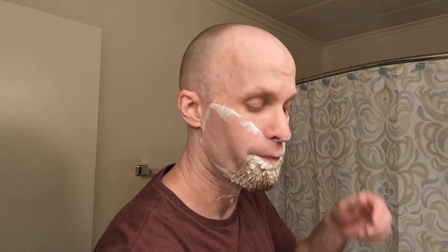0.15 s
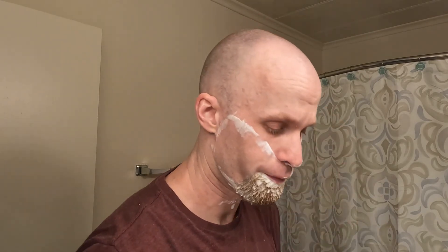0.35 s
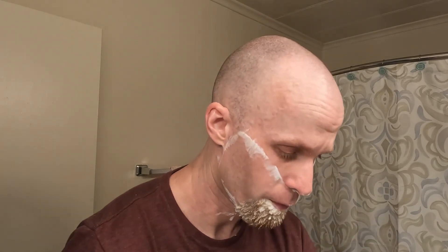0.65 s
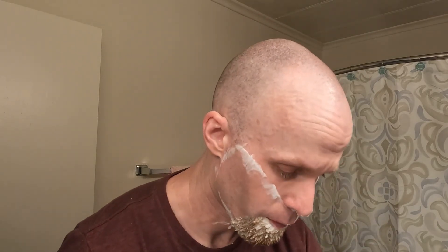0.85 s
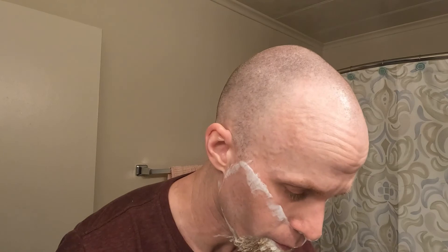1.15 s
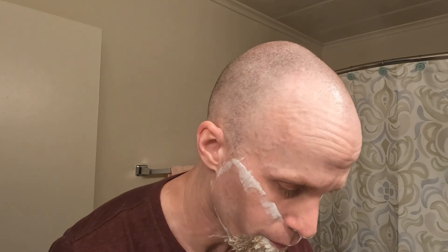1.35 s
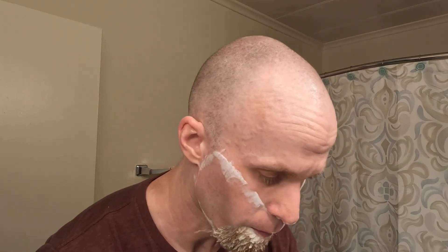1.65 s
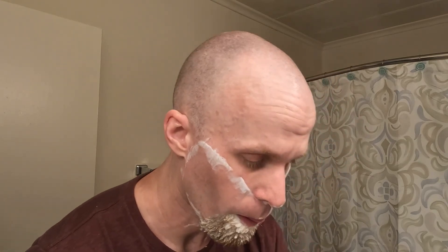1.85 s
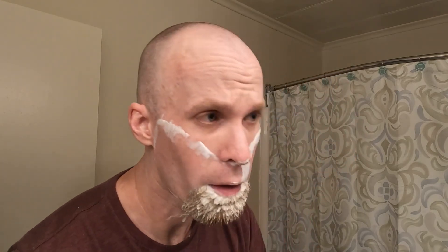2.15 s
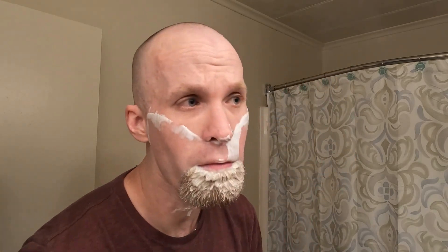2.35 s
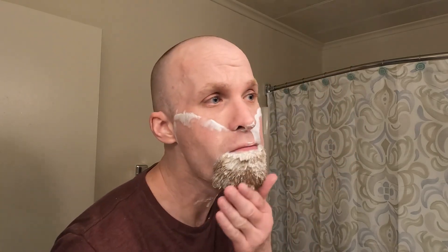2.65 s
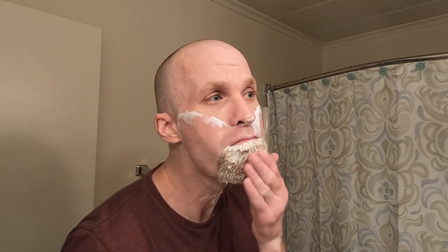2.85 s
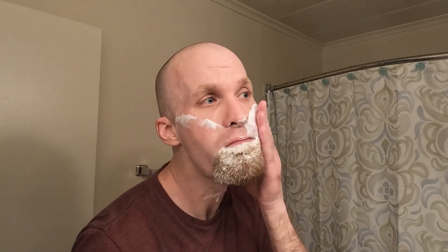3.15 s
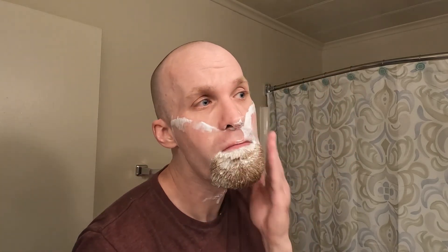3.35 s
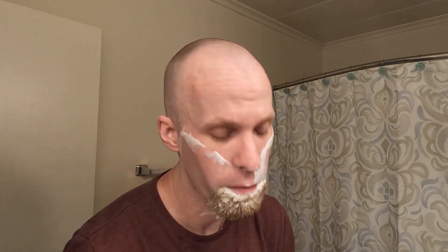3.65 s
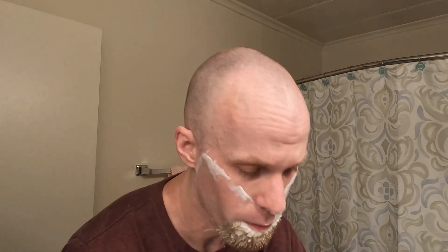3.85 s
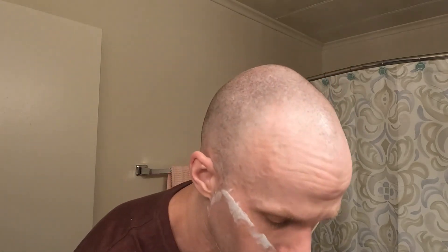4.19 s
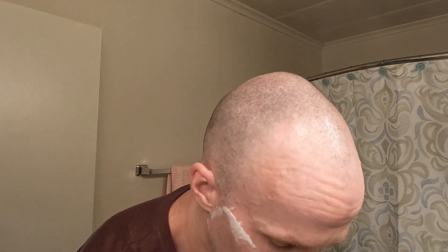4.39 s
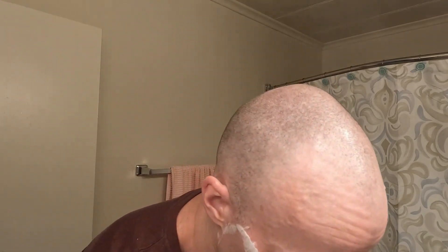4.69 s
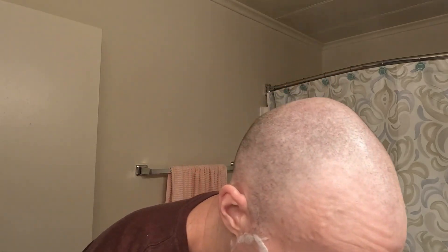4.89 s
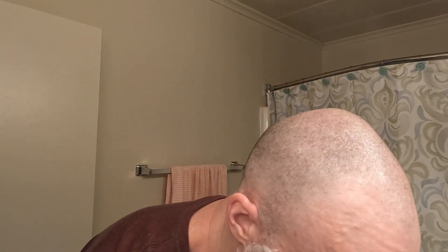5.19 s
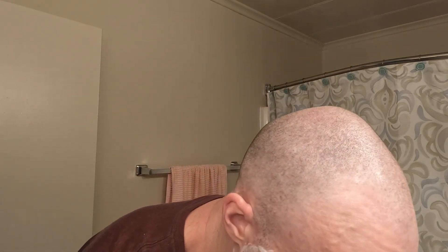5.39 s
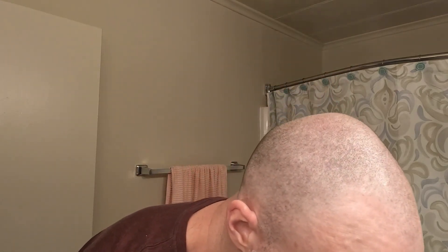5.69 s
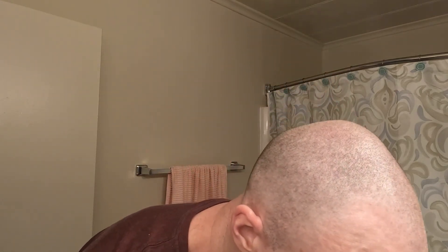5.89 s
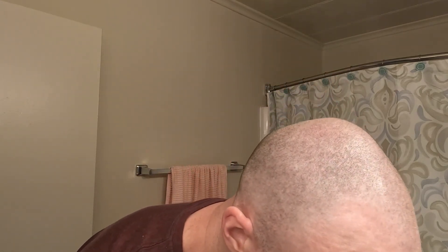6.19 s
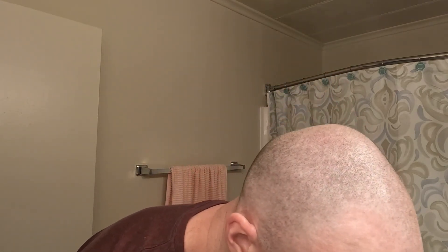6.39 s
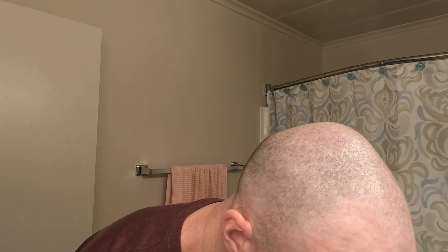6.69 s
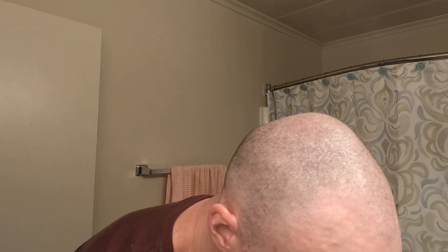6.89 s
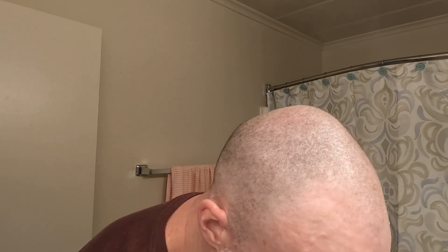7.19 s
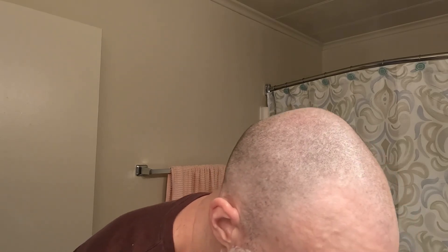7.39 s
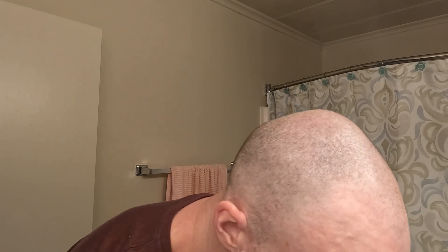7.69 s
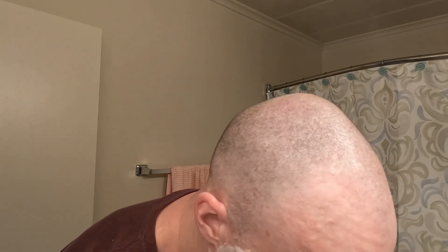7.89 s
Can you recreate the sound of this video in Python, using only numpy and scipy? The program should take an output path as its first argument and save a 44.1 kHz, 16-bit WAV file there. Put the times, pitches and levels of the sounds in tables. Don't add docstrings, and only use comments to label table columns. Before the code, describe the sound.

Tap water bursts into a basin, stops with a sharp knock, a palm rasps over a beard, then water runs longer and knocks off.

```python
import sys
import numpy as np
from scipy import signal
from scipy.fft import rfft, irfft, next_fast_len
from scipy.io import wavfile
from scipy.ndimage import uniform_filter1d

SR = 44100
rng = np.random.default_rng(int(sys.argv[2]) if len(sys.argv) > 2 else 0)


def natural_amplitude(level_db):
    exponent = np.asarray(level_db, float) / 20
    return 10 ** exponent


def materialize(psi):
    bounded = np.clip(np.atleast_2d(psi).T, -1, 1)
    quanta = np.round(bounded * 32767).astype(np.int16)
    wavfile.write(sys.argv[1], SR, quanta)


N = 354563

# water arrives in s, valve shuts in s, spray level in dB, drone level in dB.
TAP = [
    (0.631, 1.666, -34.5, -42),
    (4.059, 7.986, -34.5, -42.5),
]
# frequency in Hz, gain in dB.
MICROPHONE = [(25, -5), (60, -8.5), (110, 0), (8600, -0.5), (10000, -0.5), (11000, 4), (11900, -12.5),
              (12800, -8.5), (13400, -17.5), (13900, -20), (14100, -29), (15600, -25)]


def jet():
    spray_sound, mist_sound, drone_sound = spray(), mist(), drone()
    surge_db = hand_surges()
    thin = filtered(spray_sound, lambda f: 1 / (1 + (4000 / (f + 1)) ** 6))
    out = np.zeros(N)
    for opens, shuts, spray_db, drone_db in TAP:
        spray_gate = valve(opens, shuts, rise_s=0.015, fall_db_s=195)
        out += natural_amplitude(spray_db - 1 + surge_db) * spray_gate * spray_sound

        mist_gate = valve(opens, shuts + 0.099, rise_s=0.015, fall_db_s=232)
        out += natural_amplitude(spray_db - 16.5 + 2.6 * surge_db) * mist_gate * mist_sound

        thin_fade_in = np.minimum(since(shuts)[0] / 0.035, 1)
        break_off_db = 700 * since(shuts + 0.099)[0]
        out += natural_amplitude(spray_db - break_off_db) * thin_fade_in * thin

        drone_gate = valve(opens - 0.0088, shuts, rise_s=0.013, fall_db_s=137)
        out += natural_amplitude(drone_db) * drone_gate * drone_sound
    return out


def spray():
    # frequency in Hz, gain in dB.
    tone = [(300, -48.5), (800, -42.5), (1200, -11.5), (1700, -8.5), (2100, -5), (3000, -2.5), (3700, -1),
            (5000, -2), (6900, -6), (8500, -13), (9200, -18.5)]
    # frequency in Hz, width in Hz, lift in dB.
    bowl = [(1500, 60, 3), (1970, 110, 5), (2140, 45, 3.5), (2350, 60, 4), (2775, 100, 4.5), (3018, 80, 4),
            (3537, 80, 6), (3760, 60, 3), (6815, 90, 2.5)]

    def lift_db(f):
        return sum(db / (1 + ((f - center) / wide * 2) ** 2) for center, wide, db in bowl)

    def sway_gain(f):
        lift = uniform_filter1d(lift_db(f), size=1500)
        return natural_amplitude(along(tone, f)) * (natural_amplitude(lift) - 1)

    water = patchy(1.62, wide=3, long=16) + 0.41 * crackle(900, spread_db=3.0)
    water += 0.19 * bubbles(360, mid_hz=3610, cycles=16.7)
    steady = unit(filtered(water, lambda f: natural_amplitude(along(tone, f) + lift_db(f))))
    sway = unit(filtered(patchy(5.2, wide=2, long=110), sway_gain))
    return unit(steady + 0.21 * sway)


def bubbles(per_s, mid_hz, cycles):
    draw = rng.random((3000, 3))[:int(per_s * N / SR)]
    hz = mid_hz * np.exp(2.27 * (draw[:, 1:2] - .5))
    t = np.arange(400) / SR
    u = t * hz / cycles
    size = natural_amplitude(-3 * np.log(draw[:, 2:] + 0.0064))
    swell = (1 - np.exp(-6 * u)) * np.exp(-2 * u)
    pips = size * np.sin(2 * np.pi * hz * t * (1 + 0.05 * u)) * swell
    where = (draw[:, :1] * N).astype(int) + np.arange(400)
    return unit(np.bincount(where.ravel(), pips.ravel(), minlength=N)[:N])


def mist():
    # frequency in Hz, gain in dB.
    tone = [(7000, -54), (8500, -5), (16000, 3)]
    fine = patchy(1.7, wide=8, long=8) + 0.49 * crackle(650, spread_db=1.5)
    fizz = filtered(fine, lambda f: natural_amplitude(along(tone, f)))
    return fizz / np.std(filtered(fizz, lambda f: natural_amplitude(along(MICROPHONE, f))))


def drone():
    # frequency in Hz, width in Hz, level in dB.
    resonances = [(141, 24, -21), (246, 55, -7.5), (330, 27, -24.5), (404.3, 34, 2), (444.6, 32.4, 2.5),
                  (490, 14.5, -0.5), (553.4, 18.4, 2), (676, 15, -2.5), (878, 12, -12), (1082, 21.6, -5),
                  (1500, 25, -27.5), (1924, 270, -8), (3260, 51, -29)]

    def gain(f):
        power = 0
        for hz, wide, db in resonances:
            power = power + abs(natural_amplitude(db) * f * wide / (hz * hz - f * f + 1j * f * wide)) ** 2
        return np.sqrt(power)

    return unit(filtered(patchy(3.13, wide=1, long=20), gain))


def hand_surges():
    # start in s, lift in dB, fade time in s.
    surges = [
        (.77, 3, .2),
        (1.2, 3.5, .25),
        (1.5, 1.5, .3),
        (4.2, 3.5, .1),
        (4.72, 2.5, .3),
        (5.95, 1.2, .15),
        (6.27, 1, .15),
        (6.83, 3, .15),
        (7.22, 1, .15),
        (7.7, 2, .3),
    ]
    lift_db = np.zeros(N)
    for s, db, fade in surges:
        after = since(s)[0]
        lift_db += db * (1 - np.exp(-after / 0.013)) * np.exp(-after / fade)
    return lift_db


def valve(opens, shuts, rise_s, fall_db_s):
    after, before = since(opens)
    climb_db = -50 * np.exp(-after / rise_s)
    return (before == 0) * natural_amplitude(climb_db - fall_db_s * since(shuts)[0])


def splashes():
    # time in s, level in dB, middle frequency in Hz, length in s.
    broad = [(.786, -30.5, 5010, 0.021), (1.106, -29.5, 1860, .013), (1.107, -37.5, 850, .011),
             (1.216, -27.5, 4000, 0.013), (1.299, -29.5, 3500, 0.012), (1.453, -30, 4400, .0076),
             (1.506, -26.5, 4380, 0.0068), (1.819, -42, 6568, .003), (1.889, -48, 4500, .004),
             (1.915, -59, 4560, 0.013), (2.046, -64, 9000, .012), (4.236, -31, 5100, 0.013),
             (6.835, -25.5, 3200, 0.009), (7.271, -34, 4940, .012), (7.321, -31.5, 4480, .013)]
    # time in s, level in dB, middle frequency in Hz, length in s.
    squirts = [
        (1.246, -29, 5600, 0.0083),
        (4.045, -56, 2300, .016),
        (4.901, -30.5, 3900, 0.018),
        (5.051, -34, 2260, .033),
        (6.266, -32, 1980, .012),
        (7.366, -33, 2370, 0.018),
        (7.975, -35.5, 4280, .018),
    ]
    # time in s, level in dB, middle frequency in Hz, length in s.
    gurgles = [
        (.131, -74, 6200, .018),
        (1.336, -33, 2700, .015),
        (6.311, -34, 1500, 0.013),
        (6.851, -35, 2460, 0.014),
        (7.76, -44, 3400, .028),
    ]
    # time in s, peak level in dB, pitch in Hz, length in cycles.
    drops = [(1.7011, -23.5, 5070, 12), (2.7266, -45, 3030, 4), (2.8612, -36, 3000, 2.9),
             (3.0913, -41, 1660, 3.8), (4.6151, -25.5, 2580, 14), (4.7081, -15, 3470, 8.5),
             (4.7118, -18.5, 3490, 4.4), (4.7163, -25.5, 3340, 6.2), (7.2154, -32.5, 2010, 13),
             (7.4404, -29, 2810, 14), (7.8211, -32.5, 1088, 13)]
    # time in s, peak level in dB, middle frequency in Hz.
    drips = [(0.619, -58, 3970), (1.8851, -47, 4800), (1.9721, -58, 11500), (2.0091, -47, 10000),
             (2.034, -45, 8000), (2.038, -43, 12500), (2.0387, -48, 3300), (2.1099, -63, 11140),
             (2.1831, -63, 10000), (2.2431, -64, 9560), (3.1601, -56, 11500), (4.032, -45, 1970),
             (4.072, -46, 2980)]

    out = puffs(broad, octaves=.56) + puffs(squirts, octaves=0.19) + puffs(gurgles, octaves=0.074)
    t = np.arange(4096) / SR
    for s, db, hz, cycles in drops:
        u = t * hz / cycles
        swell = (1 - np.exp(-8 * u)) * np.exp(-1.7 * u)
        rising_tone = np.sin(2 * np.pi * hz * t * (1 + .02 * u))
        add(out, s, natural_amplitude(db + 3) * rising_tone * swell)
    for s, db, hz in drips:
        add(out, s, natural_amplitude(db - 6.5 - 60 * t / 0.024) * band(hz, 0.82, size=4096))
    return out


def lever():
    # time in s, level in dB, tilt in dB per octave, rattle level in dB.
    knocks = [(0.6164, -22.5, -2.5, -10), (0.6236, -21, 0.5, -16), (1.6751, -17.5, 4, 1.5),
              (1.6841, -12.5, 1, -2.5), (1.6968, -23.5, -5.5, 4.5), (4.0308, -34, -3.5, -2),
              (4.0435, -36.5, -3.5, -7), (7.9909, -21.5, -4, -14), (8.0012, -17, 2.5, -12),
              (8.0085, -20.5, -4, 2), (8.0264, -24, 0, -8)]
    # frequency in Hz, level in dB, time to fall 60 dB in s.
    modes = [(75.1, -16, 0.72), (120, -8, 0.15), (150, -6.5, 0.31), (192, -5.5, 0.094), (245, 2, 0.19),
             (330, -11, 0.32), (419, -1, 0.15), (442, 3.5, 0.03), (511, -1.5, 0.043), (528, 3.5, 0.044),
             (599, -6, 0.28), (674.4, -9.5, 0.17)]
    # time in s, level in dB, middle frequency in Hz, length in s.
    bumps = [(.265, -47, 325, 0.0157), (2.146, -51, 367, .013), (2.318, -54, 333.5, 0.012),
             (2.47, -65, 298, 0.011), (2.577, -59, 305, .014), (2.855, -58, 150, .0174),
             (2.953, -50, 278, 0.0123), (3.134, -62, 370, 0.0076), (3.212, -52.5, 330, 0.0093),
             (3.287, -55, 390, .0077), (3.59, -58, 350, 0.0115)]
    # time in s, level in dB, middle frequency in Hz, length in s.
    raps = [
        (.51, -55.5, 560, .029),
        (2.72, -56, 563, .027),
        (3.549, -48.5, 368, .008),
        (3.551, -63, 800, .008),
        (3.77, -52, 466, 0.028),
        (3.78, -63, 1000, .018),
    ]

    out = puffs(bumps, octaves=0.2) + puffs(raps, octaves=0.35)
    t = np.arange(SR // 2) / SR
    for s, db, tilt_db, rattle_db in knocks:
        ring = np.zeros(len(t))
        for hz, level, t60 in modes:
            strength_db = level + tilt_db * np.log2(hz / 400) + rng.normal(0, 0.6)
            wobble = 0.033 * np.cumsum(rng.standard_normal(len(t)))
            tone = np.sin(2 * np.pi * hz * rng.normal(1, .03) * t + wobble)
            ring += natural_amplitude(strength_db - 60 * t / t60) * tone * rng.choice([1, 1, -1])
        thud = natural_amplitude(3.5 - 60 * t / 0.11) * band(382, 0.38, size=len(t))
        rattle = natural_amplitude(rattle_db - 8.5 - 60 * t / 0.14) * band(1055, 0.41, size=len(t))
        onset = 1 - np.exp(-t / 0.0013)
        add(out, s, natural_amplitude(db - 10.0) * (ring + thud + rattle) * onset)
    return out


def creak():
    out, t = np.zeros(N), np.arange(SR // 10) / SR
    swell = np.sin(np.pi * t * 10) ** .5
    flutter = 1 + .5 * np.sin(2 * np.pi * 33 * t)
    add(out, 3.903, natural_amplitude(-50.0) * swell * np.sin(2 * np.pi * 410 * t) * flutter)
    return out


def palm():
    # frequency in Hz, gain in dB.
    beard = [(900, -34), (2000, -9.5), (3200, -2), (5500, -7), (8000, -16.5), (16000, -18)]
    # start in s, length in s, level in dB, skin level over bristles in dB.
    strokes = [
        (2.525, 0.062, -55, -20),
        (2.715, 0.19, -55.5, -9.5),
        (2.867, .19, -51, -9),
        (3.096, 0.049, -63.5, 3),
    ]

    snaps = patchy(2.2, wide=4, long=10) + .6 * crackle(1500, spread_db=2.5)
    bristle = unit(filtered(snaps, lambda f: natural_amplitude(along(beard, f))))
    rub = patchy(2.5, wide=2, long=8)
    skin = unit(filtered(rub, lambda f: np.exp(-.5 * (np.log2((f + 1) / 1600) / .35) ** 2)))
    out = np.zeros(N)
    for s, length, db, skin_db in strokes:
        after, before = since(s)
        press = natural_amplitude(db - 292 * before - 34 * after - 350 * since(s + length)[0])
        out += press * (natural_amplitude(-3.4) * bristle + natural_amplitude(skin_db - 1.5) * skin)
    return out


def room(x):
    # frequency in Hz, time to fall 60 dB in s.
    tiles = [(100, 1), (400, 0.68), (2000, 0.54), (10000, 0.25)]
    hz, t, z = signal.stft(rng.standard_normal(SR), SR, nperseg=256)
    decay = natural_amplitude(-60 * t / along(tiles, hz)[:, None])
    tail = signal.istft(z * decay, SR, nperseg=256)[1]
    late = np.pad(x, (150, 0))
    return signal.fftconvolve(late, tail / np.linalg.norm(tail))[:N]


def air():
    # frequency in Hz, gain in dB.
    tone = [(30, -29), (100, -13.5), (250, -4.5), (330, -5.5), (500, -5.5), (1000, -13.5), (2800, -19),
            (6500, -30), (8000, -37.5), (9500, -43), (11000, -37.5), (12500, -35), (16000, -54)]
    room_mode = lambda f: (f * 120 / (325 ** 2 - f * f + 1j * f * 120)) ** 2
    hum = unit(filtered(patchy(4.4, wide=1, long=6), room_mode))
    hush = unit(filtered(patchy(0.4, wide=4, long=20), lambda f: natural_amplitude(along(tone, f))))
    shudder = np.zeros(N)
    for _, shuts, _, _ in TAP:
        after, before = since(shuts)
        shudder += (before == 0) * natural_amplitude(-39.5 - 51 * after)
    return (natural_amplitude(-62) + shudder) * hum + natural_amplitude(-64.0) * hush


def puffs(events, octaves):
    out, t = np.zeros(N), np.arange(8192) / SR
    for s, db, hz, length in events:
        swell = t / length * np.exp(-1.2 * t / length)
        add(out, s - .6 * length, natural_amplitude(db + 8) * swell * band(hz, octaves, size=8192))
    return out


def band(hz, octaves, size):
    f = np.fft.rfftfreq(size, 1 / SR) + 1
    bell = np.exp(-.5 * (np.log2(f / hz) / octaves) ** 2)
    return unit(irfft(rfft(rng.standard_normal(size)) * bell, size))


def patchy(patchy_db, wide, long):
    z = signal.stft(rng.standard_normal(N + 512), nperseg=256)[2]
    field = uniform_filter1d(rng.standard_normal(z.shape), size=wide, axis=0)
    field = uniform_filter1d(field, size=long, axis=1)
    return unit(signal.istft(z * natural_amplitude(patchy_db * unit(field)), nperseg=256)[1][:N])


def crackle(per_s, spread_db):
    when, size, sign = rng.random((3, N))
    strength = natural_amplitude(-spread_db * np.log(size + 1e-4))
    return unit((when < per_s / SR) * strength * np.sign(sign - .5))


def filtered(x, response):
    m = next_fast_len(N + SR)
    return irfft(rfft(x, m) * response(np.fft.rfftfreq(m, 1 / SR)), m)[..., :N]


def along(points, hz):
    f, v = np.transpose(points)
    return np.interp(np.log(hz + 1), np.log(f + 1), v)


def since(s):
    t = np.arange(N) / SR - s
    return np.maximum(t, 0), np.maximum(-t, 0)


def add(track, s, sound):
    part = track[round(s * SR):][:len(sound)]
    part += sound[:len(part)]


def unit(x):
    return x / np.sqrt(np.mean(x ** 2) + 1e-20)


def scene():
    knocks, wet, water = lever() + creak(), splashes(), jet()
    echo = room(natural_amplitude(-7.5) * knocks + natural_amplitude(-9.0) * wet + natural_amplitude(-12) * water)
    mono = knocks + wet + water + echo + palm() + air()
    return np.array([mono, mono])


def roll_off(x):
    return signal.sosfilt(signal.butter(12, 15630, fs=SR, output="sos"), x)


def record(dry):
    # frequency in Hz, side level over middle in dB.
    side_level = [(100, -42), (500, -36), (1000, -34.5), (3000, -36), (5000, -33), (7000, -31), (9500, -28),
                  (11500, -18), (11800, -1.5), (16000, -6)]
    notch_hz, notch_wide_hz, top_hz = 9040, 330, 15720
    notch = lambda f: abs(f - notch_hz) / np.hypot(f - notch_hz, notch_wide_hz)
    mid = filtered(dry[0], lambda f: natural_amplitude(along(MICROPHONE, f)) * notch(f) * (f < top_hz))

    z = signal.stft(mid, nperseg=256)[2]
    scrambled = z * np.exp(2j * np.pi * rng.random(z.shape))
    other = unit(signal.istft(scrambled, nperseg=256)[1][:N]) * np.std(mid)
    side = filtered(other, lambda f: natural_amplitude(along(side_level, f)) * (f < top_hz))
    return roll_off(np.array([mid + side, mid - side]))


dry = scene()
out = record(dry)
materialize(out)
```